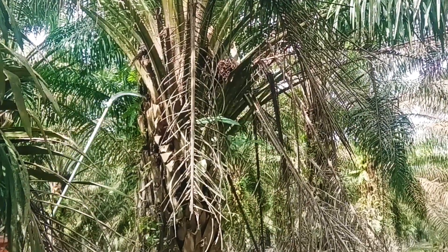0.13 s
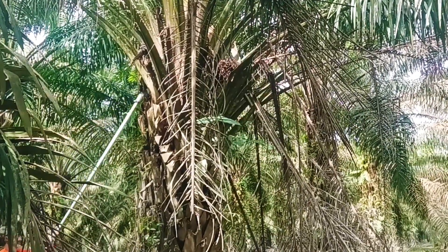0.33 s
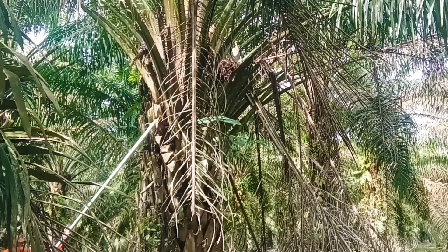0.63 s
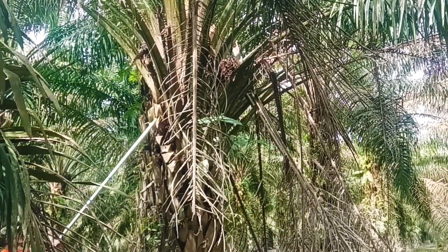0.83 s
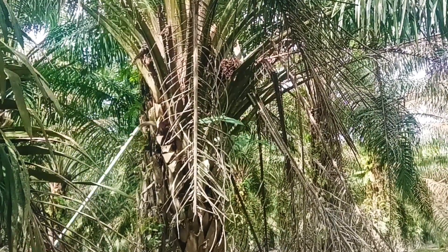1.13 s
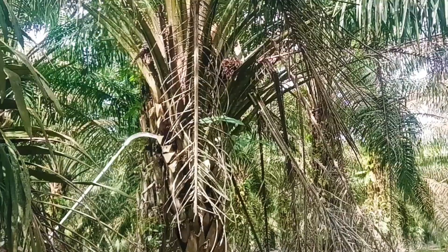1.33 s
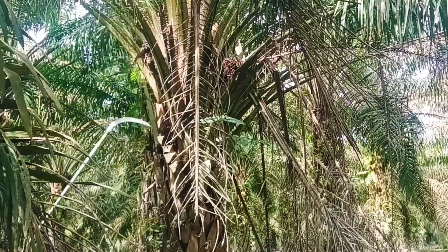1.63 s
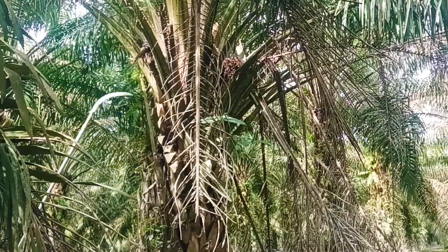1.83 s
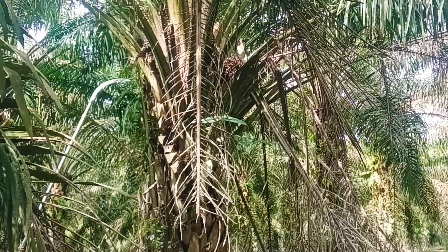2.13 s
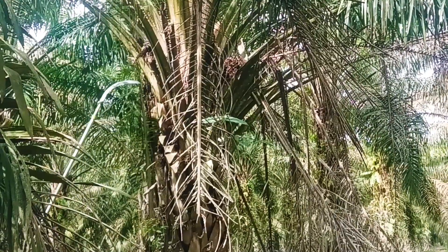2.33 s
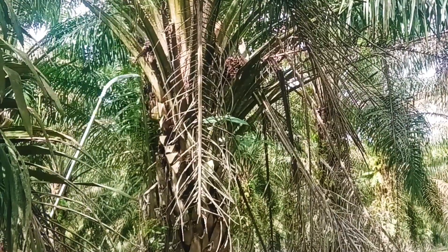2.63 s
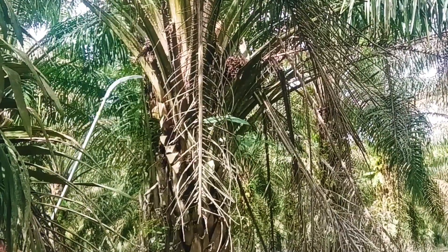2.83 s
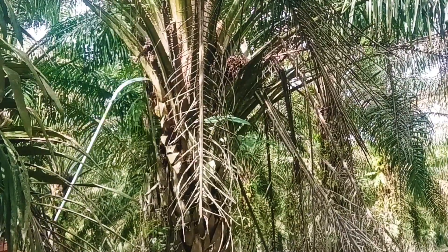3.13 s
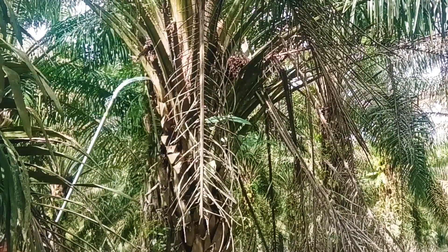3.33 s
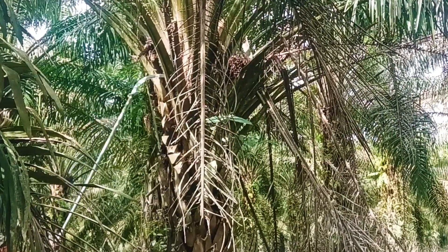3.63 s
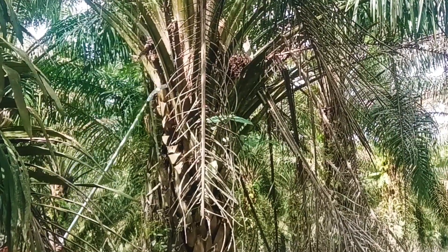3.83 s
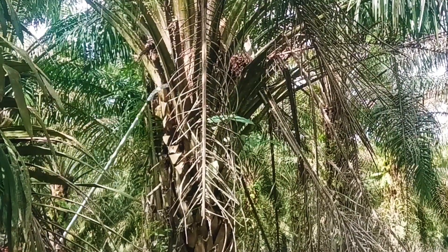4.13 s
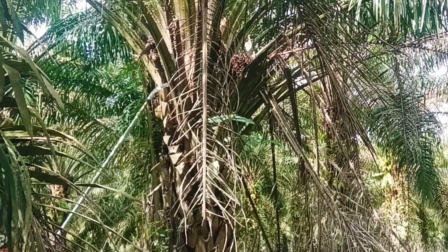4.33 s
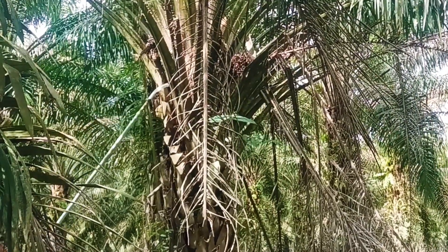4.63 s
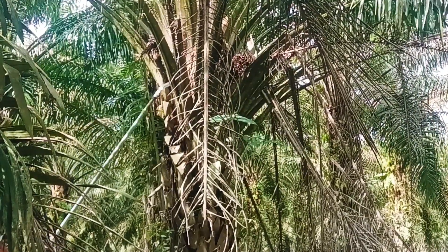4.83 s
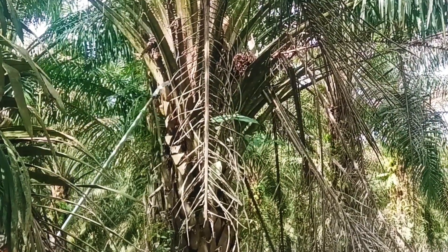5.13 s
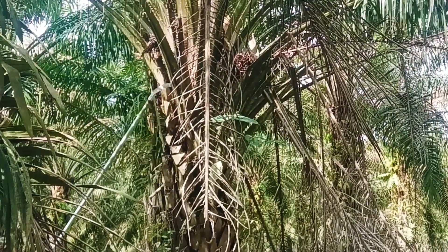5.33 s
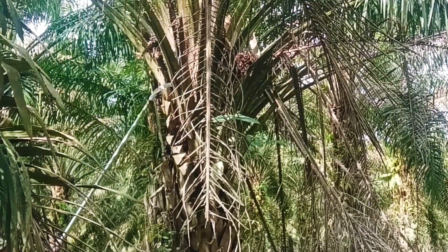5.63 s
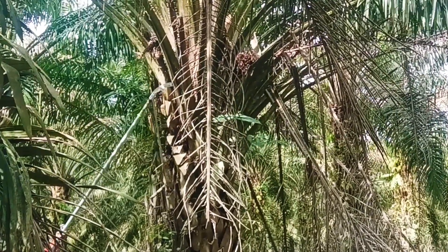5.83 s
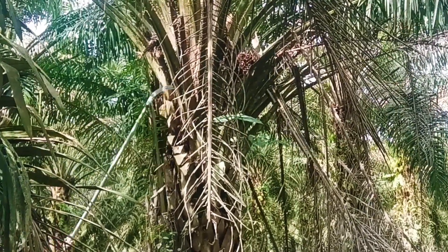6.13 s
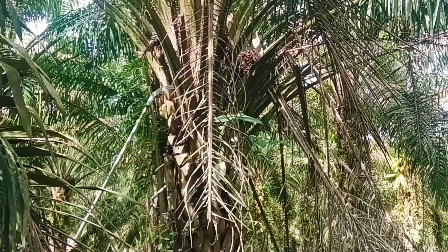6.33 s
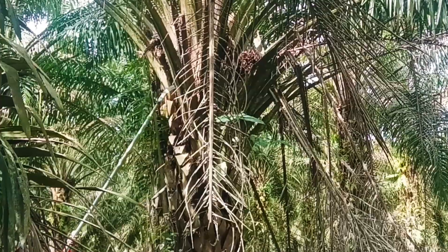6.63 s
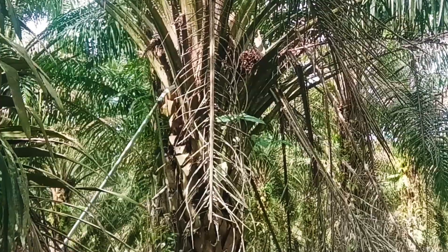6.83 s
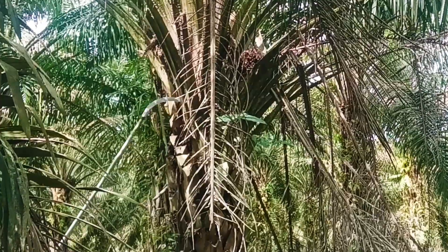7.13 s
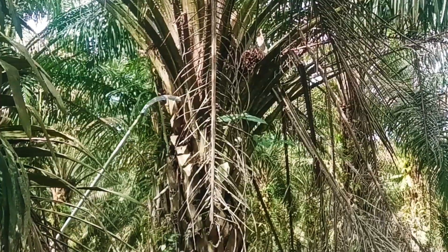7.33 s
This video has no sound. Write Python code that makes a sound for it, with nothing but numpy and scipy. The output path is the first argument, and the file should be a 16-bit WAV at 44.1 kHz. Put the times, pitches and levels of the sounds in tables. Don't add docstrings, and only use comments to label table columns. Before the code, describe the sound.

Dry palm leaves rustle and crack as a long-handled blade knocks and tears through stalks, while shrill insects buzz constantly in the grove.

```python
import sys
import numpy as np
from scipy import signal
from scipy.fft import rfft, irfft, next_fast_len
from scipy.io import wavfile
from scipy.ndimage import uniform_filter1d

SR = 44100
rng = np.random.default_rng(int(sys.argv[2]) if len(sys.argv) > 2 else 0)


def dump(signal):
    limited = np.clip(np.atleast_2d(signal).T, -1, 1)
    pcm = np.round(limited * 32767).astype(np.int16)
    wavfile.write(sys.argv[1], SR, pcm)


def level_to_linear(level):
    exponent = np.asarray(level, float) / 20
    return 10 ** exponent


N = 329427
FAST = next_fast_len(N)
RING_T = np.arange(SR // 5) / SR

# (frequency [Hz], likeness [0-1])
NEAR_LIKENESS = [(200, 0.96), (700, 1), (1400, 0.47), (2500, 0.29), (4000, 0.17), (8000, 0.11)]


def evened(x):
    return x / np.sqrt(np.mean(x ** 2) + 1e-20)


def read(points, hz):
    f, value = np.transpose(points)
    return np.interp(np.log(hz + 1), np.log(f + 1), value)


def add(mix, s, sound):
    part = mix[round(s * SR):][:len(sound)]
    part += sound[:len(part)]


def sine(hz, t):
    return np.sin(2 * np.pi * hz * t)


def at_ports(pair, likeness, colour=((1, 0), (2, 0))):
    hz = np.fft.rfftfreq(FAST, 1 / SR)
    a, b = rfft(pair, FAST) * level_to_linear(read(colour, hz))
    c = np.clip(read(likeness, hz), 0, 1)
    return irfft(np.array([a, c * a + np.sqrt(1 - c ** 2) * b]), FAST)[:, :N]


def slow_noise(seconds):
    span = max(int(seconds * SR), 2)
    return evened(uniform_filter1d(uniform_filter1d(rng.standard_normal(N), span), span))


def lumpy(spread_db, lump_s):
    lumps = slow_noise(lump_s)
    return rng.standard_normal((2, N)) * level_to_linear(spread_db * lumps)


def air():
    # (frequency [Hz], likeness [0-1])
    far_likeness = [(60, 0.85), (130, 0.7), (300, 0.46), (1500, 0.071), (3000, 0.052)]
    # (frequency [Hz], level [dB per Hz])
    air_colour = [(30, 4.5), (58, -1), (120, -1), (300, -8.5), (700, -14.5), (1200, -19), (2000, -18.5),
                  (3300, -19), (5500, -25), (9000, -33), (12500, -33), (14500, -21.5), (15600, -32)]
    return level_to_linear(-52) * evened(at_ports(lumpy(0.16, 0.29), far_likeness, air_colour))


def cicadas():
    # (drum frequency [Hz], width [Hz], rate [clicks per s], level [dB])
    insects = [(7075, 360, 270, 3), (7160, 84, 352, 7), (6805, 370, 780, 4), (7354, 370, 460, 6.5),
               (7700, 670, 150, -12), (7513, 160, 440, -3)]
    # (time [s], level [dB])
    last_fade = [(0, 14), (1.2, 14.5), (2.2, 3)]
    out = np.zeros((2, N))
    for hz, width, rate, db in insects:
        wander = evened(uniform_filter1d(rng.standard_normal((2, N)), size=300))
        turns = np.cumsum(rate * (1 + 0.065 * wander), axis=1) / SR
        clicks = np.diff(np.floor(turns), prepend=0) * level_to_linear(2.0 * wander[::-1])
        drive = evened(clicks) + 1.5 * rng.standard_normal((2, N))
        drum = signal.iirpeak(hz, hz / (1.43 * width), SR)
        buzz = level_to_linear(db) * evened(signal.lfilter(*drum, signal.lfilter(*drum, drive)))
        out += buzz
    fade = level_to_linear(np.interp(np.arange(N) / SR, *np.transpose(last_fade)))
    out += buzz * (fade - 1)
    return level_to_linear(-45.5) * evened(out)


def grove(x):
    # (frequency [Hz], t60 [s])
    grove_decay = [(500, 0.083), (4000, 0.28), (12000, 0.019)]
    hz, t, z = signal.stft(rng.standard_normal((2, SR // 2)), SR, nperseg=256)
    dying = level_to_linear(-60 * t / read(grove_decay, hz)[:, None])
    tail = signal.istft(z * dying, SR, nperseg=256)[1]
    return signal.fftconvolve(x, tail / np.linalg.norm(tail[0]), axes=1)[:, :N]


def leaflet_snaps(out):
    # (time [s], peak level [dB], centre frequency [Hz])
    snaps = [(0.087, -31, 6000), (0.1206, -23, 5100), (.177, -38, 1250), (0.15, -33.5, 4300),
             (0.1744, -28, 5000), (0.2546, -27, 5530), (0.2984, -36, 6000), (0.328, -40, 4500),
             (0.358, -32, 5000), (0.474, -41, 4500), (0.5048, -32, 5500), (.006, -28, 3000),
             (0.018, -35, 2900), (1.2768, -15, 2500), (1.7158, -30, 1380), (1.7124, -35, 920),
             (2.563, -34, 3670), (2.833, -42.5, 3120), (2.919, -37, 6000), (3.0919, -33.5, 1900),
             (3.0936, -40, 1200), (4.4243, -37.5, 3800), (4.611, -34.5, 1440), (4.6198, -35, 4500),
             (4.643, -28, 3500), (4.8083, -28, 4500), (6.0701, -31.5, 1500), (6.2785, -37, 1490),
             (6.3008, -39, 2080), (6.647, -21.5, 3760), (6.304, -37.5, 1200), (6.33, -36, 1800),
             (6.345, -37, 2500), (.09, -46, 1500), (.258, -48, 1200), (6.81, -36.5, 1300),
             (7.1462, -32, 3160), (7.15, -41, 3600), (7.2146, -19, 1500), (7.374, -25, 2430)]
    t = RING_T
    for s, db, hz in snaps:
        ring = level_to_linear(-60 * t * hz / 9) * sine(hz, t)
        tick = np.convolve(rng.standard_normal(len(t)), ring[:200])[:len(t)]
        tick *= level_to_linear(-60 * t / 0.0051)
        add(out, s, level_to_linear(db + 0.5) * (ring + 0.31 * tick))


def blade_rings(out):
    # (time [s], level [dB], frequency [Hz], t60 [s])
    rings = [(0.797, -35, 2334, 0.07), (.805, -29.5, 2330, 0.081), (1.437, -38, 2500, .06),
             (1.495, -35.5, 2480, .15), (1.52, -30, 2250, 0.073), (1.535, -34, 2800, 0.065),
             (0.84, -34, 1380, 0.036), (0.86, -29, 1900, 0.047), (1.278, -26.5, 1500, .06),
             (1.325, -30, 1440, .06), (5.308, -41.5, 3150, 0.1), (5.297, -47, 5760, 0.1),
             (6.07, -37, 3000, 0.23), (6.071, -45, 2800, .15), (6.075, -40, 4210, 0.15),
             (6.078, -33.5, 5050, 0.12), (6.085, -51, 7300, 0.23), (6.281, -47, 10150, 0.3),
             (6.279, -44.5, 12000, 0.17), (7.443, -31.5, 1620, 0.12), (7.388, -36, 2400, .06)]
    # (time [s], level [dB], start frequency [Hz], glide [Hz per s])
    squeaks = [(.832, -23, 2020, -17000), (3.34, -45, 1940, -9000), (3.54, -43, 1990, -15000),
               (3.724, -62, 2110, -9000), (4.082, -41, 2130, -9000), (5.55, -47.5, 1725, -6000),
               (6.613, -43.5, 2610, -9000)]
    rise_s, squeak_t60 = 0.0046, 0.058
    t = RING_T
    steady = [row + (0,) for row in rings]
    gliding = [(s, db, hz, squeak_t60, glide) for s, db, hz, glide in squeaks]
    for s, db, hz, t60, glide in steady + gliding:
        rub_phase, rub_level = evened(uniform_filter1d(rng.standard_normal((2, len(t))), size=220))
        phase = 2 * np.pi * (hz + 0.5 * glide * t) * t + 0.5 * rub_phase
        wave = np.sin(phase) * level_to_linear(2.8 * rub_level)
        add(out, s, level_to_linear(db - 60 * t / t60) * wave * np.minimum(t / rise_s, 1))


def clean_chop(out):
    # (frequency [Hz], level [dB], t60 [s])
    chop_modes = [(220, -2.5, 0.065), (403, 2.5, 0.045), (535, -1, 0.062), (877, -1.5, 0.092),
                  (1097, -3, 0.043), (1400, 0.5, 0.038), (1860, -3, .08), (2230, 3.5, 0.038),
                  (2420, -9, .07), (2920, -9, 0.038), (3483, -13, .08)]
    t = RING_T
    chop = sum(level_to_linear(db - 60 * t / t60) * sine(hz, t) for hz, db, t60 in chop_modes)
    add(out, 3.7875, level_to_linear(-27.5) * chop * np.minimum(t / 0.0013, 1))


def stalk_blows(out):
    # (time [s], peak level [dB], ring [Hz], relative crack level [dB], t60 [s])
    knocks = [(0.562, -29, 358, -10.5, 0.036), (.583, -35, 400, -23, .04), (.603, -33, 326, -19, 0.043),
              (.651, -36, 328, -17, .05), (.703, -31, 400, -24, 0.025), (0.69, -22, 337, -6, 0.032),
              (1.367, -17.5, 330, -22, 0.032), (1.489, -26, 323, -34, 0.06),
              (1.501, -26.5, 341, -29, 0.037), (1.408, -31, 403, -20, .04), (1.644, -38.5, 320, -2, 0.064),
              (3.803, -26, 894, -34, 0.045), (3.826, -34.5, 290, -25, 0.049),
              (3.967, -30.5, 906, -11, 0.023), (4.61, -32.5, 494, -22, 0.06),
              (4.643, -17, 1055, -21, 0.018), (4.711, -29, 471, -11, 0.11), (4.621, -25, 604, -16, 0.028),
              (4.72, -24.5, 755, -15, .04), (4.73, -20, 530, -25.5, 0.038), (4.743, -19.5, 745, -19, 0.018),
              (4.766, -19.5, 590, -21, 0.031), (4.78, -30, 560, -20, 0.036),
              (4.792, -26.5, 487, -21, 0.036), (5.467, -34.5, 556, -22, 0.093),
              (5.486, -35, 600, -20, 0.044), (6.301, -31, 608, -7.5, 0.029), (6.625, -46, 806, -9, 0.025),
              (7.374, -26.5, 801, -15.5, 0.026)]
    # (time [s], level [dB], ring [Hz], crack [dB], t60 [s])
    thumps = [(0.254, -32, 210, -27, 0.042), (0.271, -28.5, 250, -36, 0.032), (.735, -37, 243, -6, 0.12),
              (1.521, -28, 302, -24, 0.051), (1.532, -25, 290, -26, 0.038), (4.885, -28.5, 208, -43, 0.061),
              (5.303, -26, 225, -29, 0.039), (5.313, -27, 190, -29, 0.047), (6.096, -19, 237, -19, 0.041),
              (6.111, -34, 215, -30, .12), (6.707, -29, 219, -31, 0.039)]
    # (time [s], level [dB], ring [Hz], crack [dB])
    tears = [(1.168, -29, 258, -27), (1.19, -24.5, 353, -12), (1.214, -30, 365, -11),
             (1.228, -24.5, 333, -16), (1.197, -24, 650, -12), (1.243, -24.5, 358, -9),
             (1.273, -21.5, 327, -4.5), (1.182, -28, 323, -20), (1.204, -24.5, 604, -16),
             (1.236, -26, 477, -14), (1.256, -22.5, 346, -18), (1.281, -27.5, 348, -18),
             (7.178, -26, 820, -13), (7.196, -22.5, 1000, -12), (7.218, -28.5, 237, 1),
             (7.24, -17.5, 870, -30), (7.251, -18, 522, -15), (7.269, -15, 844, -20),
             (7.283, -25, 1060, -12), (7.292, -17, 540, -9.5), (7.188, -25, 900, -14),
             (7.209, -24, 600, -9), (7.227, -25.5, 400, -13), (7.257, -27, 600, -22),
             (7.298, -22, 598, -18)]
    # (frequency [Hz], level [dB])
    crack_modes = [(620, 3.5), (900, -0.5), (1230, -5), (1500, 5.5), (1890, 13), (2300, 9.5), (2600, 0.5),
                   (3050, 3.5), (3500, -4), (4200, -29), (5000, -30)]
    t = RING_T
    parted = [row + (0.044 * (row[2] / 400) ** -0.3,) for row in tears]
    blows = knocks + thumps + parted
    for (s, db, hz, crack_db, t60), luck in zip(blows, rng.random((len(blows), 2, len(crack_modes)))):
        hold = level_to_linear(-60 * (t / max(t60, 0.005)) ** 1.33) * np.minimum(t * hz / 1.14, 1)
        overtone = 0.28 if hz < 250 else 0.35
        second_hz = hz * (1.45 + 0.352 * luck[1, 0])
        thud = hold * (sine(hz, t) + overtone * sine(second_hz, t))
        crack = 0
        for (f, d), a, b in zip(crack_modes, *luck):
            fall = level_to_linear(d - 9.4 * a - 60 * t * f ** 0.39 / 0.72)
            crack = crack + fall * np.sin(2 * np.pi * f * (0.97 + 0.05 * b) * t + 6 * a)
        splinters = uniform_filter1d(rng.standard_normal(len(t)), size=4)
        splinters *= 0.21 * level_to_linear(-60 * t / 0.0051)
        add(out, s, level_to_linear(db - 3.5) * (thud + level_to_linear(crack_db - 0.5) * (crack + splinters)))


def impacts():
    out = np.zeros(N)
    stalk_blows(out)
    leaflet_snaps(out)
    clean_chop(out)
    blade_rings(out)
    return at_ports(np.array([out, np.roll(out, 37)]), NEAR_LIKENESS)


def swell(start, db, fall, rise, let_go=1):
    rise, fall = max(rise, 0.001), max(fall, 0.01)
    t = np.arange(0, rise + 3 * fall, 1 / SR)
    ramp = np.minimum(t / rise, 1)
    return start, (ramp * level_to_linear(db - 20 * (np.maximum(t - rise, 0) / fall) ** let_go)) ** 2


def foliage_curves(frond):
    # (time [s], level [dB], fall [s per 20 dB], brightness [dB])
    raps = [(0.0, -46, 0.31, -5.5), (0.557, -50.5, 0.27, -3), (0.687, -39, 0.1853, -8.5),
            (1.357, -41.5, 0.25, -8), (3.092, -54.5, 0.22, -15), (3.787, -44, 0.12, -35),
            (6.277, -41, -0.04, -3), (6.646, -41, 0, -5.5), (7.373, -34, 0.05, -12.5)]
    # (start [s], level [dB], fall [s per 20 dB], brightness [dB], swell [s])
    drags = [(.06, -47.5, 0.36, -6, 0.064), (.28, -58.5, 0.5, 0, 0.017), (.47, -54, 0.46, -6.5, 0.053),
             (.79, -50.5, 0.15, -4.5, 0.027), (1.154, -33.5, 0.22, -7, 0.1),
             (1.474, -39, 0.31, -8.5, 0.018), (1.619, -43, 0.38, -4.5, 0.0069),
             (3.913, -44.5, 0.08, -8, 0.042), (4.1, -57, -0.07, -17.5, 0.092),
             (4.6, -40.5, 0.11, -11.5, 0.022), (4.635, -44, 0.14, -14, 0.01),
             (4.706, -45, 0.18, -16, 0.015), (4.76, -48, 0.16, -19, .01), (4.804, -48.5, 0.19, -13, 0.0088),
             (4.9, -62.5, 6, -11.5, 0.027), (5.298, -55.5, 0.06, -14, 0.0088),
             (5.39, -49.5, 0.04, -12, 0.086), (6.0, -64, 1, -1.5, 0.0068), (6.065, -39, 0.09, -10.5, 0.019),
             (6.2, -52, -0.06, -16.5, 0.086), (6.284, -42, 0.03, -9, 0.018), (6.32, -46, -0.17, -10, 0.015),
             (6.679, -53.5, 0.08, 2.5, 0.0068), (6.77, -53, -1, -11, 0.056), (7.155, -38.5, 0.5, -8, 0.031),
             (7.17, -33, 0.2, -9, 0.065), (7.419, -37.5, -3, -6, 0.046)]
    touches = [(0, frond, frond, -5.5)]
    for s, db, fall, bright, rise in [row + (0.00085,) for row in raps] + drags:
        power = swell(s, db, fall, rise)[1]
        quick = swell(s, db, fall * 0.89, rise)[1]
        touches.append((s, power, quick, bright))
    ribs, leaf, fizz = np.zeros((3, N))
    for s, power, quick, bright in touches:
        add(ribs, s, power)
        add(leaf, s, power * level_to_linear(2 * (-3 + 0.3 * bright)))
        add(fizz, s, quick * level_to_linear(2 * bright))
    return np.sqrt([ribs, leaf, fizz])


def stalk_curves(frond):
    # (start [s], level [dB], fall [s per 20 dB], resonance [Hz], swell [s])
    scrapes = [(.04, -54, 0.4, 376, 0.019), (.2, -53, 0.2, 257, 0.11), (0.559, -42, 0.16, 390, 0.0036),
               (.688, -36, 0.1, 384, 0.017), (.795, -54, 0.2, 310, 0.011), (1.151, -31, 0.12, 445, 0.089),
               (1.2, -36, -0.02, 354, 0.07), (1.357, -34.5, 0.12, 388, 0.0058),
               (1.476, -43.5, 0.57, 344, 0.015), (1.61, -42, -0.95, 370, 0.032),
               (3.788, -43, 0.25, 580, 0.0023), (3.925, -41.5, 0.13, 820, 0.029),
               (4.601, -29.5, 0.11, 620, 0.027), (4.708, -36, 0.19, 610, 0.035),
               (4.645, -48, 0.32, 755, .004), (4.763, -46, 0.3, 564, 0.0094),
               (5.299, -46, 0.18, 250, 0.0065), (5.38, -46.5, 0.1, 450, 0.043),
               (5.43, -41, 0.07, 600, 0.052), (6.1, -39.5, 0.08, 233, 0.0037),
               (6.273, -40, 0.17, 583, 0.0067), (6.62, -46.5, 0.26, 270, 0.006),
               (6.77, -51, 0.26, 284, 0.012), (7.162, -27.5, 0.16, 700, 0.034),
               (7.19, -25.5, 0.04, 623, 0.094), (7.37, -39, 0.04, 695, 0.0034)]
    further_scrapes = [(3.085, -63, 0.043, 900, .005), (5.997, -48, 0.028, 500, 0.017),
                       (6.067, -39.5, 0.076, 785, 0.013), (6.2, -47, 0.074, 300, 0.038),
                       (6.68, -43, 0.026, 260, 0.019), (7.05, -51.5, 0.073, 350, 0.028)]
    touches = [(0, frond * level_to_linear(2 * -5), 500)]
    for s, db, fall, hz, rise in scrapes + further_scrapes:
        touches.append((*swell(s, db, fall, rise, let_go=0.87), hz))
    stalk, weighted = np.zeros((2, N))
    for s, power, hz in touches:
        add(stalk, s, power)
        add(weighted, s, power * hz)
    return np.sqrt(stalk), uniform_filter1d(weighted / stalk, size=300)


def rustle(ribs, leaf, fizz):
    # (frequency [Hz], level [dB per Hz])
    rib_colour = [(500, -19), (900, -6), (1400, -1.5), (2400, 2), (3300, 0), (4200, -27)]
    leaf_colour = [(2700, -15.5), (3500, 2.5), (4600, 1.5), (5800, -7), (7000, -25)]
    fizz_colour = [(3240, -20), (5500, -6.5), (7420, 4.5), (9090, -5), (11300, -6.5), (14600, -26),
                   (15500, -23)]
    crackles = (rng.random(N) < 350 / SR) * level_to_linear(1.3 * np.minimum(rng.exponential(1, N), 3))
    grains = lumpy(0.32, 0.014) * (1 + 0.47 * signal.lfilter([1], [1, -0.97], crackles))
    out = ribs * evened(at_ports(grains, NEAR_LIKENESS, rib_colour))
    out += level_to_linear(2.0) * leaf * evened(at_ports(grains, NEAR_LIKENESS, leaf_colour))
    out += level_to_linear(7.5) * fizz * evened(at_ports(grains, NEAR_LIKENESS, fizz_colour))
    return out * level_to_linear(0.8 * slow_noise(0.015))


def resonate(x, hz, width):
    turn = np.exp(2j * np.pi * np.cumsum(hz * np.ones(N)) / SR)
    r = np.exp(-np.pi * width / SR)
    return 2 * (turn * signal.lfilter([1 - r], [1, -r], x / turn)).real


def scrape(stalk, stalk_hz):
    # (frequency [Hz], level [dB per Hz])
    stalk_colour = [(71, -46), (120, -18), (232, 7), (426, -3.5), (513, -0.5), (687, -1), (1600, -5),
                    (2080, -60), (3520, -120)]
    slips = lumpy(1.9, 0.0041)
    ringing = np.array([resonate(resonate(x, stalk_hz, 330), stalk_hz, 320) for x in slips])
    bass = 3.1 * level_to_linear(-3 * np.maximum(np.log2(stalk_hz / 350), 0))
    body = evened(at_ports(ringing, NEAR_LIKENESS))
    body = body + bass * evened(at_ports(slips, NEAR_LIKENESS, stalk_colour))
    return level_to_linear(-1.5) * stalk * evened(body)


def strokes():
    # (time [s], level [dB])
    frond_fall = [(1.5, -50.5), (1.66, -53), (1.81, -47), (1.92, -42.5), (2.29, -48), (2.47, -59.5),
                  (2.75, -65), (2.95, -71.5)]
    fall_db = np.interp(np.arange(N) / SR, *np.transpose(frond_fall), left=-150, right=-150)
    frond = level_to_linear(2 * fall_db)
    return rustle(*foliage_curves(frond)) + scrape(*stalk_curves(frond))


def scene():
    blows = impacts()
    return air() + cicadas() + level_to_linear(-9.0) * grove(blows) + blows + strokes()


def top_cut(x):
    return signal.sosfilt(signal.butter(12, 15880, fs=SR, output="sos"), x)


def record(dry):
    # (frequency [Hz], left minus right [dB])
    port_difference = [(1000, 0), (3000, -1.5), (5000, -4), (6300, -7.5), (7400, -17), (8200, -8),
                       (9200, -5), (10500, 17), (12500, 14), (15500, 39)]
    left_lag_s, edge_hz = 6 / SR, 15450
    hz = np.fft.rfftfreq(FAST, 1 / SR)
    rounded = 0.3 * np.tanh(dry / 0.3)
    ratio = level_to_linear(2 * read(port_difference, hz))
    left = np.sqrt(2 * ratio / (1 + ratio)) * np.exp(-2j * np.pi * hz * left_lag_s)
    right = np.sqrt(2 / (1 + ratio))
    bass_cut = 1 / (1 + (50 / (hz + 1)) ** 19.0) + level_to_linear(-34) * (hz > 18)
    ports = np.array([left, right]) * (hz < edge_hz) * bass_cut
    heard = irfft(rfft(rounded, FAST) * ports, FAST)[:, :N]
    return top_cut(heard)


dry = scene()
out = record(dry)
dump(out)
```